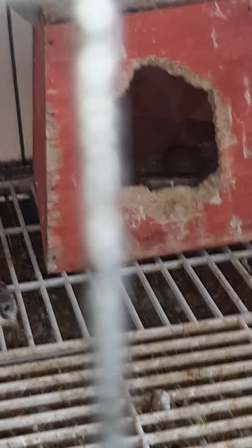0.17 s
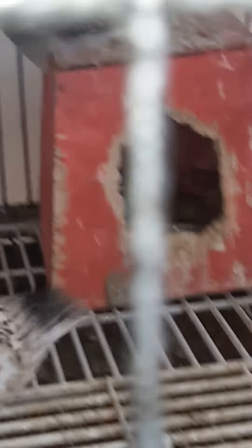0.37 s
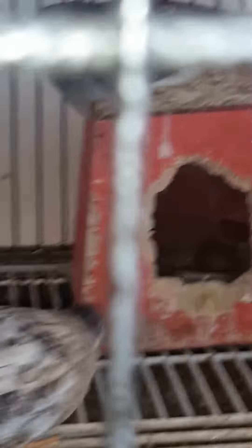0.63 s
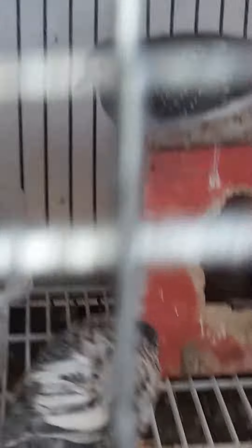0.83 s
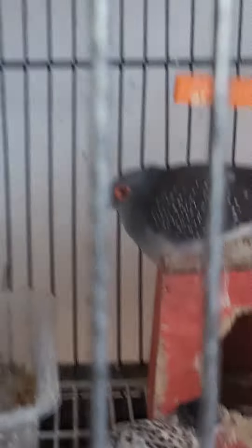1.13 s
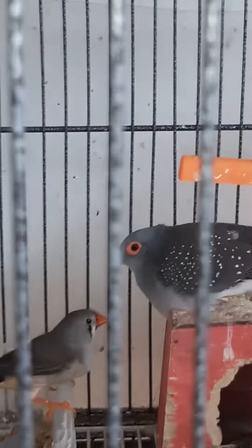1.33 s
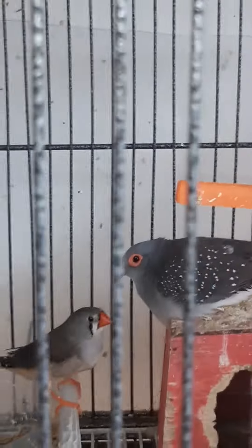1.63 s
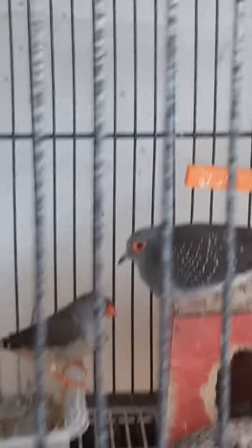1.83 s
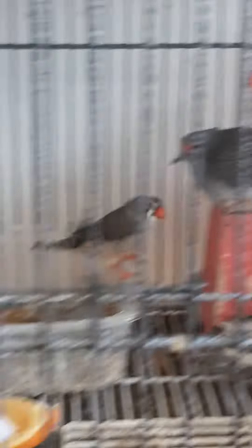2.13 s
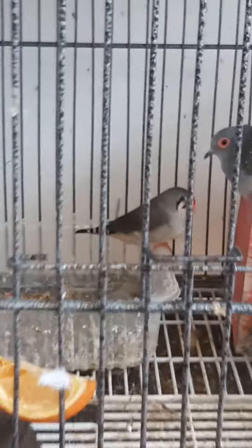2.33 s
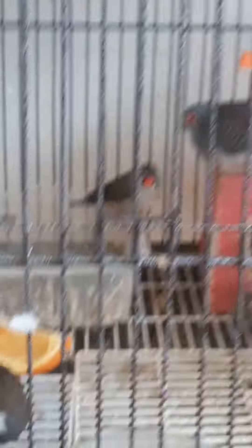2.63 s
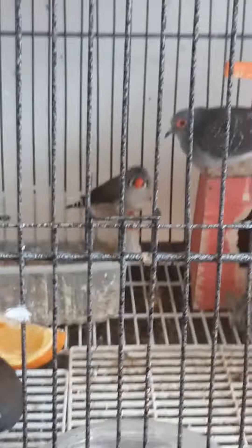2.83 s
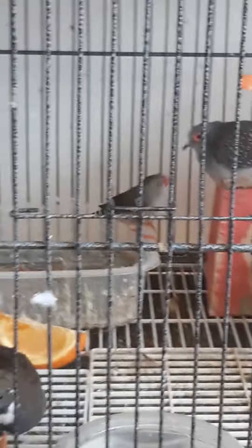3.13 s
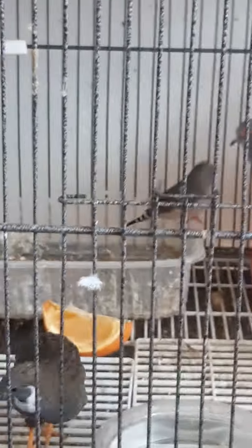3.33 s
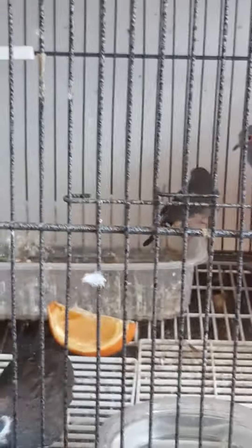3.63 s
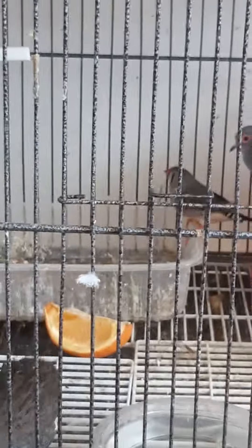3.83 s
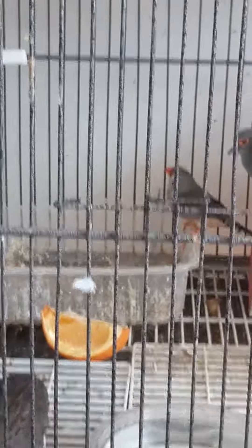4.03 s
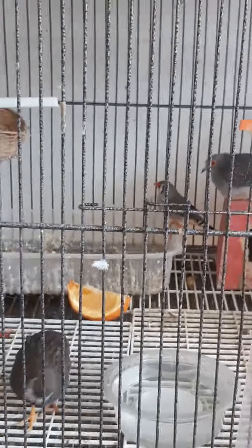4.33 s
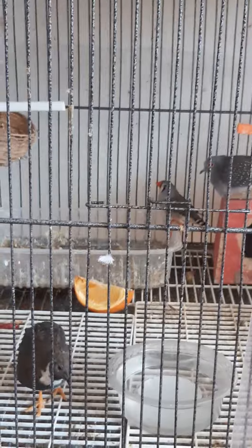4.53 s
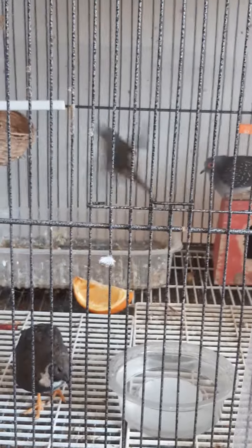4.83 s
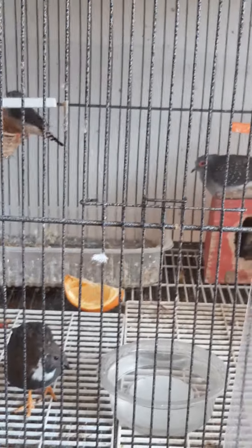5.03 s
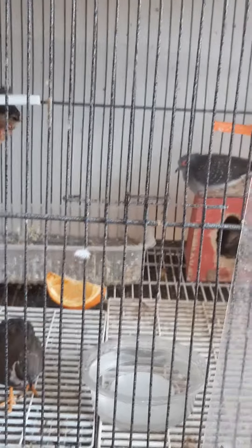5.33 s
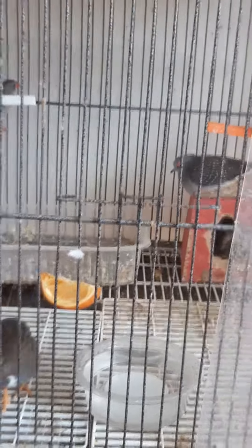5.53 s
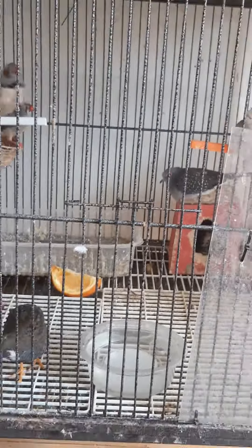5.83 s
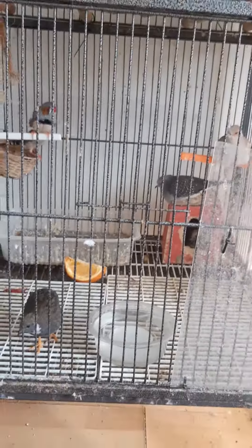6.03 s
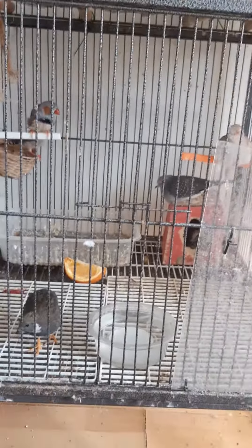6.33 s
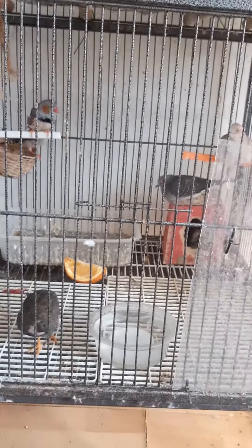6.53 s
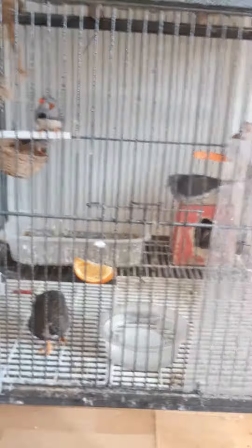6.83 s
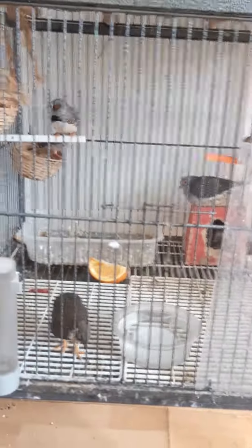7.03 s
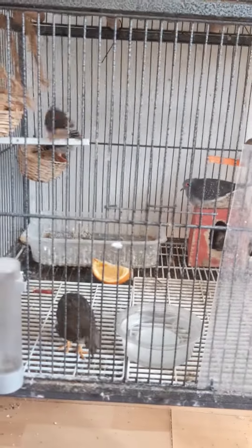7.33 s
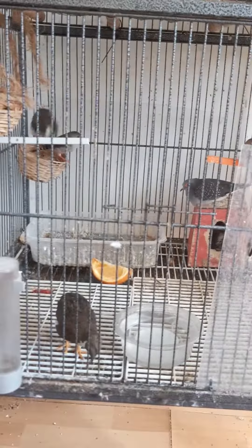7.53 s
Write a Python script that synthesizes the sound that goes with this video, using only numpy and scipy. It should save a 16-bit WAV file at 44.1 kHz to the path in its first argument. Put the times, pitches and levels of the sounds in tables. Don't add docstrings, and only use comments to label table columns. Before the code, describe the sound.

Close to a cage in a reverberant hard-walled room, on a phone. Soft peeps and a thin rasp open, then at 0.2 s a loud, bright burst of tiny overlapping whistles, around a tenth of a second long, with a quick warble at 0.5. It quietens; wire rattles and dull tray thuds at 1.25-1.5 with low handling rumble, then soft nasal beeps at 1.85 and 2.0. Another loud burst comes at 2.4, a small falling chirp at 2.9. Loud bursts repeat at 3.8, 4.4, 5.3, 6.2 and 7.0, with a whistled flurry at 5.8-6.0. Quiet finch chirps that drop in pitch run from 4.15 to 6.0. Wings flutter dully at 3.7 and 4.6, with knocks and a faint cage hum after. Nasal beeps return at 6.5 and 7.4, amid faint twitter. The background murmur swells and sinks until the end, about 7.7.

```python
import sys
import numpy as np
from scipy import signal
from scipy.fft import rfft, irfft, next_fast_len
from scipy.io import wavfile
from scipy.ndimage import uniform_filter1d

SR = 44100
rng = np.random.default_rng(int(sys.argv[2]) if len(sys.argv) > 2 else 0)


def to_wav(sig):
    pcm = np.clip(np.atleast_2d(sig), -1, 1) * 32767
    pcm = np.round(pcm).astype(np.int16)
    wavfile.write(sys.argv[1], SR, pcm.T)


def nominal_scale(level):
    x = np.asarray(level, float) / 20
    return 10 ** x


N = 338943


def evened(x):
    return x / np.sqrt(np.mean(x ** 2) + 1e-20)


def smoothed_noise(count, width):
    return uniform_filter1d(rng.standard_normal(count), width)


def read(points, hz):
    f, value = np.transpose(points)
    return np.interp(np.log(hz + 1), np.log(f + 1), value)


def add(mix, s, sound):
    part = mix[..., max(round(s * SR), 0):][..., :sound.shape[-1]]
    part += sound[..., :part.shape[-1]]


def coloured(x, points):
    size = next_fast_len(x.shape[-1])
    gain = nominal_scale(read(points, np.fft.rfftfreq(size, 1 / SR)))
    return irfft(rfft(x, size) * gain, size)[..., :x.shape[-1]]


def syrinx(hz, partial_db, waver, rough, air_db, edge):
    count = len(hz)
    drift = evened(uniform_filter1d(smoothed_noise(count, 50), 50))
    shake = evened(uniform_filter1d(smoothed_noise(count, 50), 50))
    turns = np.cumsum(hz * (1 + waver * drift)) / SR
    tone = np.zeros(count)
    for k, db in enumerate(partial_db, 1):
        audible = k * hz < SR / 2.5
        tone += nominal_scale(db) * np.sin(2 * np.pi * k * turns) * audible
    air = nominal_scale(air_db) * rng.standard_normal(count)
    voice = np.sqrt(2) * tone * (1 + rough * shake) + air
    return voice * signal.windows.tukey(count, np.clip(edge, 0, 1))


# (time [s], length [s], low voice [Hz], high voice [Hz], level [dB])
CONTACT_CALLS = [(0.204, 0.1, 2678, 3402, -18), (2.436, 0.095, 2620, 3358, -17),
                 (3.789, 0.093, 2755, 3566, -15), (4.402, 0.11, 2732, 3575, -17),
                 (5.312, .096, 2659, 3356, -18), (6.162, 0.093, 2780, 3516, -14.5),
                 (6.986, 0.11, 2662, 3556, -14)]
# (place [share of call], length [s], start pitch [ratio], end pitch [ratio], level [dB])
LOW_TUNE = [(0.438, .02, .97, 1.0, -2), (0.601, 0.029, 1.11, 1.09, 1.5), (0.836, 0.0292, .99, .94, -2),
            (1.075, 0.025, 1.15, 1.14, -6.5), (1.452, 0.0222, 1.04, 1.09, -10)]
# (place [share of call], length [s], start pitch [ratio], end pitch [ratio], level [dB])
HIGH_TUNE = [(0.279, 0.027, 1.02, 1.0, -8), (1.0, 0.025, .98, 1.02, -3)]
# (time [s], pitch [Hz], level [dB])
OPENING_NOTES = [(0.2, 2390, -23.5), (2.433, 2210, -23.5), (3.78, 2200, -30), (4.407, 2507, -25),
                 (5.32, 2300, -29), (6.162, 2640, -16), (6.991, 2404, -24.5)]
# (time [s],
# length [s], start [Hz], end [Hz], level [dB])
LOOSE_NOTES = [(.164, 0.061, 3315, 3490, -32.5), (.277, 0.039, 2360, 2220, -27),
               (.319, 0.02, 3685, 3620, -30.5), (.524, 0.022, 4754, 4700, -25),
               (3.435, 0.03, 2734, 2720, -43.5), (2.461, 0.012, 3000, 2900, -24),
               (2.628, 0.016, 2650, 2510, -28), (3.255, 0.048, 2886, 2390, -36),
               (3.29, 0.037, 2287, 2056, -34.5), (3.325, 0.03, 1850, 1250, -30),
               (6.1, 0.097, 3000, 2760, -26.5), (3.502, 0.019, 2680, 2770, -43),
               (3.823, 0.038, 4220, 4240, -35.5), (5.819, 0.035, 3784, 3923, -21),
               (5.861, 0.053, 2810, 2846, -20.5), (5.919, 0.036, 3270, 3145, -23),
               (5.964, 0.0081, 2627, 2580, -24.5), (5.916, 0.06, 2367, 2257, -25),
               (6.002, 0.015, 3270, 3110, -25.5), (6.148, 0.032, 3670, 4060, -26),
               (7.403, 0.034, 2687, 2250, -34.5), (7.43, 0.045, 2310, 2086, -33.5),
               (7.674, 0.025, 2450, 2615, -30.5), (5.812, 0.011, 3167, 3230, -23.5),
               (5.968, 0.028, 2700, 2683, -31), (6.03, 0.027, 2290, 2010, -38.5),
               (5.345, .03, 2550, 2580, -27), (5.4, .04, 2400, 2250, -27), (7.03, .02, 2900, 2750, -20),
               (.53, .012, 2050, 2300, -30), (.543, .013, 2760, 2650, -24), (.563, .025, 3850, 3980, -29),
                (.58, .015, 2600, 2760, -25), (.594, .02, 3100, 3350, -25.5), (.56, .03, 2600, 3400, -29),
                (.61, .03, 2900, 3100, -29), (.235, .02, 2750, 2900, -22), (.627, .011, 2500, 2750, -26),
                (.638, .012, 3500, 3720, -26), (.664, .014, 3600, 3600, -29), (.677, .015, 2500, 2600, -31),
                (.26, .03, 3000, 2950, -19), (.305, .03, 3100, 3600, -22), (2.499, .018, 2950, 2950, -16),
                (2.455, .02, 1900, 1950, -32), (2.465, .03, 4000, 4150, -35),
                (4.508, .016, 3550, 3520, -17), (4.455, .012, 2650, 2680, -20),
                (4.385, .05, 4000, 4150, -33), (3.795, .022, 2650, 2680, -24),
                (3.885, .02, 2800, 2780, -17), (5.375, .03, 2950, 3050, -20),
                (7.083, .014, 2750, 2600, -18), (6.2, .025, 2750, 2800, -18), (6.24, .02, 3000, 2750, -17)]
# (frequency [Hz], gain [dB])
PARAKEET_BEAK = [(1200, -17), (1900, -2), (4500, 0), (6000, -9), (10000, -11), (14000, -4)]


def parakeet():
    notes = LOOSE_NOTES
    opening_s, sag = 0.028, 0.018
    for s, hz, db in OPENING_NOTES:
        notes = notes + [(s, opening_s, hz * (1 + sag), hz * (1 - sag), db)]
    for s, call_s, low_hz, high_hz, call_db in CONTACT_CALLS:
        for voice_hz, tune in ((low_hz, LOW_TUNE), (high_hz, HIGH_TUNE)):
            for place, length, start, end, db in tune:
                notes = notes + [(s + place * call_s, length, voice_hz * start, voice_hz * end, call_db + db)]
    out = np.zeros(N)
    scoop, scoop_s = 0.07, 0.003
    for s, length, start_hz, end_hz, db in notes:
        hz = np.linspace(start_hz, end_hz, round((length + 0.0056) * SR))
        hz = hz * (1 - scoop * np.exp(-np.arange(len(hz)) / (scoop_s * SR)))
        note = syrinx(hz, (-2.5, -19, -23, -41, -30), waver=0.016, rough=0.55, air_db=-17, edge=0.45)
        add(out, s - 0.005, nominal_scale(db) * note)
    return coloured(out, PARAKEET_BEAK)


# (time [s], length [s], start [Hz], end [Hz], level [dB])
SOFT_PEEPS = [(.014, .04, 2255, 2280, -34), (.075, .087, 2283, 2200, -34.5),
              (0.306, .061, 1253, 680, -48.5), (0.51, .095, 2372, 2398, -39),
              (1.045, 0.075, 3300, 3320, -62), (2.411, .009, 3415, 3935, -39.5),
              (2.644, .061, 2235, 2270, -41.5), (2.684, .021, 2133, 1830, -44.5),
              (3.271, .028, 6800, 6505, -56.5), (3.592, .05, 2200, 2050, -54),
              (3.767, 0.03, 3400, 3500, -34), (3.998, .03, 4245, 4300, -39), (4.375, .027, 3330, 3510, -34),
              (5.782, 0.02, 4730, 4675, -38), (6.095, .076, 3170, 1790, -34),
              (5.974, .031, 4070, 4220, -37), (6.969, .047, 3453, 3400, -33.5),
              (6.941, .027, 3420, 3450, -48), (7.01, 0.016, 1915, 1815, -40),
              (6.463, .051, 603, 849, -44.5), (7.416, .077, 2600, 2125, -48.5),
              (7.59, .03, 2445, 2150, -46), (7.621, .027, 1785, 1485, -42.5),
               (7.48, .021, 1750, 1400, -47), (7.463, .032, 3250, 3120, -41),
               (7.451, .054, 2185, 2085, -42.5), (7.549, .051, 3075, 2905, -48.5),
               (7.551, .014, 1245, 1190, -44.5), (3.188, .049, 1155, 1245, -47),
               (3.233, 0.0144, 1305, 1595, -45), (3.206, .024, 3685, 3705, -56),
               (3.424, .019, 1205, 1125, -50), (3.574, 0.0187, 1275, 1155, -48),
               (5.901, .029, 1495, 1405, -41.5), (6.016, 0.027, 1745, 1600, -44),
               (.031, .021, 1455, 1445, -44.5), (6.248, 0.0254, 1650, 1500, -36.5),
               (6.44, .03, 1600, 1590, -46), (5.4, 0.045, 5100, 5200, -46.5),
               (5.512, .025, 1180, 1130, -49), (2.835, .025, 1300, 1300, -48.5),
               (2.89, .03, 2050, 2000, -41.5), (5.69, 0.028, 1200, 1150, -44.5)]
# (frequency [Hz], level [dB])
OCTAVE_OVER = [(1500, -11), (2400, -5.5), (3400, -10), (4600, -5.5), (6000, -7), (9000, -31)]


def peeps():
    out = np.zeros(N)
    for s, length, start_hz, end_hz, db in SOFT_PEEPS:
        hz = np.linspace(start_hz, end_hz, round(length * SR))
        octave_db = read(OCTAVE_OVER, 2 * hz)
        partial_db = (0, octave_db, 2 * octave_db - 6)
        add(out, s, nominal_scale(db) * syrinx(hz, partial_db, waver=0.014, rough=0.49, air_db=-13.5, edge=0.14))
    return out


# (time [s], length [s], pitch [Hz], level [dB], sag [share of pitch])
NASAL_BEEPS = [(1.112, 0.022, 610, -43, .25), (1.84, 0.097, 535, -36, 0.063),
               (2.002, .09, 551.6, -34, .066), (5.73, 0.11, 514, -44, 0.013), (6.497, 0.07, 560, -43, 0.1),
               (6.769, 0.037, 497, -42.5, 0.024), (7.417, 0.081, 545.5, -42, 0.0376),
               (7.527, .069, 611.6, -41.5, 0.044)]
# (frequency [Hz], level [dB])
NASAL_COLOUR = [(500, -9), (1000, -3), (2000, -4), (3150, 3.5), (4600, 0), (5600, -12), (8300, -36),
                (15000, -34.5)]


def beeps():
    out = np.zeros(N)
    for s, length, pitch_hz, db, sag in NASAL_BEEPS:
        u = np.linspace(0, 1, round(length * SR))
        hz = pitch_hz * (1 - 0.07 * np.exp(-u / 0.13) - sag * u)
        partial_db = [read(NASAL_COLOUR, k * hz) - 6 for k in range(1, 28)]
        swell = nominal_scale(db - 7.1 * (1.5 - u))
        add(out, s, swell * syrinx(hz, partial_db, waver=0.0012, rough=0.3, air_db=-14, edge=0.5))
    return out


# (time [s], top pitch [Hz], level [dB], hold [s])
FALLING_CHIRPS = [(2.86, 1247, -39, .03), (3.193, 1173, -61, .03), (3.673, 1250, -59, .02),
                  (4.153, 1377, -36.5, .034), (4.319, 1339, -39, .034), (4.479, 1332, -37, .03),
                  (4.923, 1376, -39, .022), (5.088, 1292, -40, .03), (5.256, 1312, -40.5, .03),
                  (5.629, 1354, -42.5, .014), (5.791, 1321, -36, .026), (5.96, 1348, -38.5, .03)]
# (frequency [Hz], level [dB])
FINCH_BEAK = [(600, -10), (1300, 1.5), (2700, -1), (4100, 2), (5400, -9), (8000, -30), (15000, -29.5)]


def chirps():
    out = np.zeros(N)
    rise_s, drop_s, slide_s = 0.00798, 0.013, 0.043
    pitch_ratios = (0.85, 1, 1, 0.63, 0.42)
    for s, top_hz, db, hold in FALLING_CHIRPS:
        dropped = hold + drop_s
        t = np.arange(round((dropped + slide_s) * SR)) / SR
        arch = 1 - 0.035 * (2 * np.minimum(t / hold, 1) - 1) ** 2
        corners = (0, rise_s, max(hold, rise_s), dropped, t[-1])
        hz = top_hz * arch * np.interp(t, corners, pitch_ratios)
        break_db = -6 * np.clip((t - hold) / 0.01, 0, 1)
        fade_db = 50 * t
        partial_db = [read(FINCH_BEAK, k * hz) - fade_db + break_db * (k > 1) for k in range(1, 16)]
        waver = 0.0091 + 0.04 * np.abs(1 - hz / top_hz)
        call = syrinx(hz, partial_db, waver=waver, rough=0.27, air_db=-29.5, edge=0.2)
        hoarse = syrinx(np.full(2000, 4250), (0,), waver=0.12, rough=0.3, air_db=-20, edge=0.5)
        spit = syrinx(np.full(400, 4800), (0,), waver=0.15, rough=0.3, air_db=-6, edge=0.1)
        add(out, s - 0.005, nominal_scale(db) * call)
        add(out, s + hold, nominal_scale(db - 5) * hoarse)
        add(out, s - 0.005, nominal_scale(db - 2) * spit)
    return out


# (time [s], length [s], centre [Hz], level [dB], pitch scatter [share])
HOARSE_RASPS = [(.001, 0.0082, 2015, -35.5, 0.022), (.001, 0.4, 4106, -44, 0.033),
                (0.087, 0.14, 3625, -44, 0.076), (2.098, 0.069, 2598, -41, 0.245),
                (2.244, 0.05, 2900, -40, 0.285), (2.332, 0.012, 3440, -38.5, 0.2),
                (2.413, 0.028, 3834, -35, 0.15), (2.858, 0.073, 3256, -37.5, 0.246),
                (2.958, 0.068, 2332, -45, 0.08), (4.37, .14, 2050, -35, .07), (5.33, .12, 2150, -34, .06),
                (3.67, .09, 3500, -52, .3), (0.31, 0.053, 1722, -39.5, 0.047),
                (3.78, 0.047, 4146, -35, 0.08), (4.33, .1, 4700, -41, .08), (6.136, 0.22, 5046, -35, 0.26),
                (6.163, .06, 5450, -34, .02)]


def rasps():
    out = np.zeros(N)
    for s, length, centre_hz, db, scatter in HOARSE_RASPS:
        hz = np.full(round(length * SR), centre_hz)
        add(out, s, nominal_scale(db) * syrinx(hz, (0, -22), waver=scatter, rough=0.21, air_db=-16.5, edge=0.047))
    return out


# (time [s], wire rattle level [dB], thud level [dB], thud pitch [Hz], rattle length [s])
CAGE_KNOCKS = [(0.81, -50, -58.5, 590, 0.041), (1.209, -60, -57.5, 810, 0.039),
               (1.255, -33, -37, 357, 0.081), (1.327, -40.5, -34.5, 285, 0.069),
               (1.356, -41, -42.5, 244.4, 0.031), (1.444, -47, -52, 431, 0.039),
               (1.504, -57, -39, 276, 0.031), (1.4999, -54, -38.5, 549, 0.055),
               (1.989, -54, -46, 700, 0.06), (2.095, -42, -58, 480, 0.017), (2.244, -44, -75, 546, 0.04),
               (2.95, -45, -87, 680, 0.056), (2, -48, -75, 600, .02), (2.414, -39.5, -75, 600, .02),
               (2.969, -41.5, -42, 328, 0.023), (3.1134, -54, -77, 630, 0.31),
               (3.539, -52, -52.5, 800, 0.049), (3.783, -46, -32, 650, 0.1), (3.947, -46, -43, 395, 0.062),
               (4.6, -52, -47, 716, 0.0078), (4.626, -57, -29, 683, 0.01), (4.835, -47, -42, 638, 0.18),
               (2.332, -41, -63, 550, 0.03), (4.675, -70, -38, 145, .02), (4.718, -70, -41, 150, .02),
               (4.762, -70, -39, 130, .02), (5.532, -52, -36, 420, 0.03), (5.8206, -40.5, -48.5, 860, 0.2),
               (5.783, -39.5, -67, 600, .02), (4.313, -43, -75, 600, 0.03), (3.507, -54, -75, 620, .03),
               (6.948, -50, -72, 600, 0.02), (6.688, -54, -76, 595, 0.08), (6.865, -58, -52, 1000, .03),
               (4.7, -52, -70, 600, .3)]
# (frequency [Hz], level [dB per Hz])
WIRE_COLOUR = [(100, -6), (1000, 0.5), (2000, 2), (4000, -2.5), (7000, -6.5), (15000, -14.5)]


def cage():
    wires, thuds = np.zeros(N), np.zeros(N)
    t = np.arange(round(0.3 * SR)) / SR
    for s, rattle_db, thud_db, thud_hz, length in CAGE_KNOCKS:
        hits = uniform_filter1d(1.0 * (rng.random(len(t)) < 0.004), 30)
        ticks = rng.standard_normal(len(t)) * (0.32 + 13.0 * hits)
        add(wires, s, nominal_scale(rattle_db - 60 * t / max(length, 0.01)) * ticks * np.minimum(t / 0.0021, 1))
        blur = 1.2 + 1.33 * evened(smoothed_noise(len(t), 45))
        thud = blur * np.minimum(t / 0.0033, 1) * np.sin(2 * np.pi * thud_hz * t)
        add(thuds, s, nominal_scale(thud_db - 60 * t / 0.041) * thud)
    return nominal_scale(23.0) * coloured(wires, WIRE_COLOUR), nominal_scale(9.0) * thuds + hum()


# (frequency [Hz], width [Hz], level [dB])
CAGE_MODES = [(284, 55, -6), (465, 23, -6), (810, 70, -6), (1250, 68, -4.5)]
# (time [s], level [dB])
CAGE_SHAKE = [(4.61, -94), (4.64, -43), (5.3, -50), (5.5, -53.5), (5.6, -83)]


def hum():
    t = np.arange(CAGE_SHAKE[0][0], CAGE_SHAKE[-1][0], 1 / SR)
    shake_db = np.interp(t, *np.transpose(CAGE_SHAKE))
    out = np.zeros(N)
    for hz, width_hz, db in CAGE_MODES:
        ring = np.exp(-np.pi * width_hz / SR)
        push = rng.standard_normal(len(t)) + 1j * rng.standard_normal(len(t))
        slow = signal.lfilter([1], [1, -ring], push)
        mode = evened((slow * np.exp(2j * np.pi * hz * t)).real)
        add(out, t[0], nominal_scale(db + shake_db) * mode)
    return out


# (time [s], length [s], level [dB])
SHORT_FLIGHTS = [(3.717, .42, -41.5), (4.641, .3, -44.5)]
# (frequency [Hz], level [dB per Hz])
WING_COLOUR = [(120, -14.5), (250, -8), (700, -0.5), (1000, -11), (2500, -26.5), (14000, -27.5)]


def wings():
    out = np.zeros(N)
    beats_per_s, depth_db = 23, 7
    for s, length, db in SHORT_FLIGHTS:
        t = np.arange(round(length * SR)) / SR
        uneven = evened(smoothed_noise(len(t), 900))
        turns = np.cumsum(beats_per_s * (1 + 0.27 * uneven)) / SR
        air = evened(coloured(rng.standard_normal(len(t)), WING_COLOUR))
        beat_db = db - depth_db * np.sin(np.pi * turns) ** 2 + 3.0 * uneven
        add(out, s, nominal_scale(beat_db) * air * signal.windows.tukey(len(t), 0.2))
    return out


# (time [s], rumble level [dB], fall [dB per s])
HAND_BUMPS = [(.85, -43, 129), (1.298, -34, 115), (3.95, -51, 115), (4.74, -39, 45), (6.02, -52, 102),
              (.25, -55.5, 150), (.55, -56, 152), (4.92, -37, 150), (6.88, -49, 120), (7.35, -56, 150),
              (1.8, -62, 148), (5.54, -47, 194), (5.8, -42, 116), (6.26, -34, 110)]


def handling():
    t = np.arange(0, N / SR + 0.01, 0.01)
    rise, still_db = 264, -66.5
    bumps = [db - np.maximum((s - t) * rise, (t - s) * fall) for s, db, fall in HAND_BUMPS]
    return t, np.maximum(np.max(bumps, axis=0), still_db)


# (time [s], level [dB])
SUPPRESSOR = [(0.0, -70), (.45, -59), (0.899, -76.5), (1.05, -86.5), (1.3, -63.5), (1.72, -96),
              (1.95, -68.5), (2.52, -53), (3.1, -60), (3.57, -65.5), (4.02, -54), (4.75, -48.5),
              (5.7, -55.5), (6.2, -57.5), (6.63, -66), (7.2, -55.5), (7.68, -72)]
# (frequency [Hz], level [dB per Hz])
RUMBLE_COLOUR = [(25, -58), (48, -26), (64, 9), (90, -2), (150, -14), (400, -19), (16000, -42.5)]
# (frequency [Hz], level [dB per Hz])
FLUTTER_COLOUR = [(60, -32.5), (250, -6), (700, -6), (1300, -0.5), (2200, -43.5), (16000, -45.5)]
# (frequency [Hz], level [dB per Hz])
CHATTER_COLOUR = [(500, -61), (1500, 7.5), (2800, 8), (4500, 5), (7000, -8.5), (16000, -17)]
# (frequency [Hz], likeness [share])
LIKENESS = [(60, 0.84), (300, 0.88), (600, 0.7), (1200, 0.067), (15000, 0.07)]


def murmur():
    frames, hz = N // 256 + 5, np.fft.rfftfreq(512, 1 / SR)
    s, chatter_db = np.transpose(SUPPRESSOR)
    flutter_db = -53 + 0.63 * (chatter_db + 53)
    same = np.clip(read(LIKENESS, hz), -1, 1)[:, None]
    out = np.zeros((2, N))
    # (colour, level over time, lift [dB], patchiness [dB])
    layers = ((RUMBLE_COLOUR, handling(), 0.1, 4.0),
              (FLUTTER_COLOUR, (s, flutter_db), 2.5, 4.5),
              (CHATTER_COLOUR, (s, chatter_db), 11.0, 4.5))
    for colour, level, lift_db, patchy_db in layers:
        a, b, c, d, patches = rng.standard_normal((frames, len(hz), 5)).T
        patches = evened(uniform_filter1d(uniform_filter1d(patches, 2, axis=0), 12, axis=1))
        left = a + 1j * b
        right = same * left + np.sqrt(1 - same ** 2) * (c + 1j * d)
        z = np.array([left, right]) * nominal_scale(read(colour, hz)[:, None] + patchy_db * patches)
        layer = evened(signal.istft(z, nperseg=512, noverlap=256)[1][:, :N])
        out += layer * nominal_scale(lift_db + np.interp(np.arange(N) / SR, *level))
    return out


# (frequency [Hz], time to fall 60 dB [s])
ROOM_DECAY = [(300, 0.38), (2000, 0.4), (4000, 0.4), (8000, 0.34), (15000, 0.42)]


def room():
    taps = np.zeros((2, SR))
    at = np.arange(200, SR - 20, 20) + rng.integers(0, 20, (2, (SR - 201) // 20))
    np.put_along_axis(taps, at, rng.choice([-1.0, 1.0], at.shape), 1)
    hz, t, z = signal.stft(taps, SR, nperseg=256)
    tail = signal.istft(z * nominal_scale(-60 * t / read(ROOM_DECAY, hz)[:, None]), SR, nperseg=256)[1]
    return tail / np.linalg.norm(tail[0])


def heard(x, tail, wet_db, pan_db, count):
    direct = np.array([x * nominal_scale(pan_db / 2), np.roll(x, count) * nominal_scale(-pan_db / 2)])
    echoes = signal.fftconvolve(x[None], tail, axes=1)[:, :N]
    return direct + nominal_scale(wet_db) * echoes * nominal_scale(np.array([[-1.2], [1.2]]))


# (time [s], lean to the left [dB])
PERCH_PLACES = [(0, 0), (.49, 0), (2.3, -2.5), (3.2, .5), (3.7, -.5), (4.3, 1.2), (5.25, 1.8), (5.75, 0),
                (6.08, -.5), (6.9, -1), (7.35, 0)]


def perched(x):
    starts = np.transpose(PERCH_PLACES)[0]
    place = np.searchsorted(starts, np.arange(N) / SR, side="right") - 1
    out = np.zeros((2, N))
    for k, (s, lean_db) in enumerate(PERCH_PLACES):
        here = heard(x * (place == k), room(), wet_db=2.0, pan_db=-2.0, count=12)
        out += here * nominal_scale(np.array([[lean_db / 2], [-lean_db / 2]]))
    return out


def scene():
    loud = perched(parakeet())
    loud_db = 10 * np.log10(abs(uniform_filter1d(loud[0] ** 2, 1500)) + 1e-9)
    duck_db = 0.41 * np.maximum(loud_db + 1.0, 0)
    mix = loud + murmur() / nominal_scale(duck_db)
    mix += heard(peeps() + rasps(), room(), wet_db=1.2, pan_db=-5.5, count=9)
    mix += heard(beeps(), room(), wet_db=2.5, pan_db=-2.5, count=14)
    mix += heard(chirps(), room(), wet_db=-1.5, pan_db=-8.0, count=11)
    wires, thuds = cage()
    near = room()
    mix += heard(wires, near, wet_db=1.0, pan_db=-0.3, count=1)
    mix += heard(thuds + wings(), near, wet_db=-2.0, pan_db=1.0, count=1)
    return mix


# (frequency [Hz], gain [dB])
MIC_COLOUR = [(38, -26), (62, -6.5), (6500, 1.5), (7300, 0.5), (8000, -5), (9200, -5.5), (11500, -4.5),
              (14000, -1.5), (15800, -7.5)]


def microphone(x):
    return coloured(1.2 * np.tanh(x / 1.2), MIC_COLOUR)


def masked(x, depth_db):
    z = signal.stft(x, nperseg=2048)[2]
    power = (abs(z[:, :1024]) ** 2).reshape(2, 128, 8, -1).mean(2)
    band_db = 10 * np.log10(power + 1e-20)
    top_db = band_db.max(1, keepdims=True)
    whim = uniform_filter1d(rng.standard_normal((1,) + band_db.shape[1:]), size=2, axis=2)
    whim_db = 6 * evened(whim) + np.zeros(band_db.shape)
    whim_db[:, 44:] -= 7 - 0.15 * np.abs(top_db - np.median(top_db))
    whim_db -= 8 * np.exp(-((np.arange(128) - 53) / 8) ** 2)[:, None]
    whim_db[:, :2] += 9
    kept = band_db + whim_db > top_db - depth_db
    z[:, :1024] *= np.repeat(kept, 8, axis=1)
    return signal.istft(z, nperseg=2048)[1][:, :N]


def low_pass(x):
    return signal.sosfilt(signal.butter(12, 16000, fs=SR, output="sos"), x)


def record(dry):
    kept = masked(microphone(dry), depth_db=44)
    finished = coloured(kept, [(15750, 0), (15850, -90)])
    return low_pass(finished)


dry = scene()
out = record(dry)
to_wav(out)
```